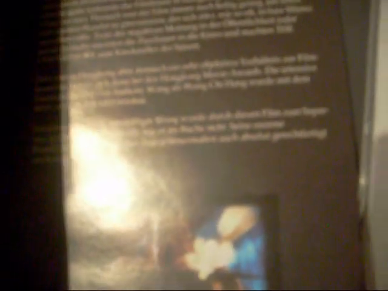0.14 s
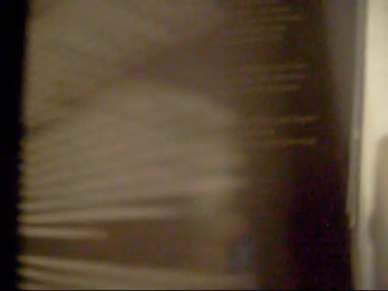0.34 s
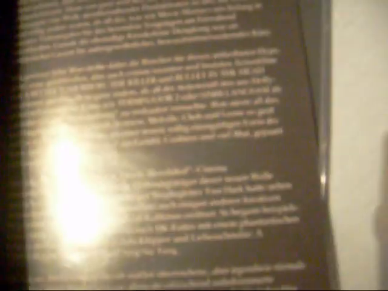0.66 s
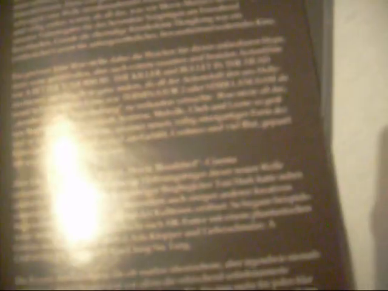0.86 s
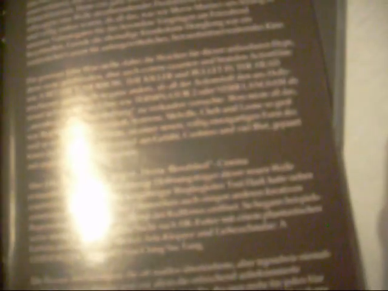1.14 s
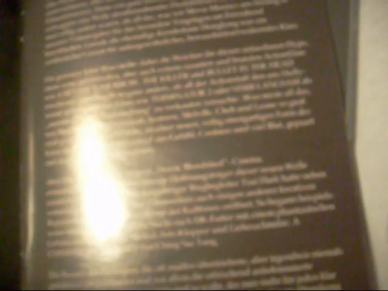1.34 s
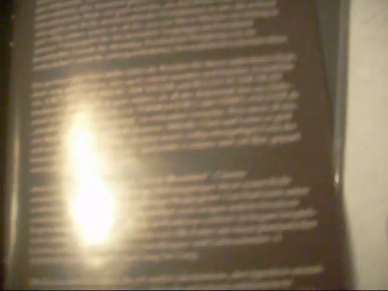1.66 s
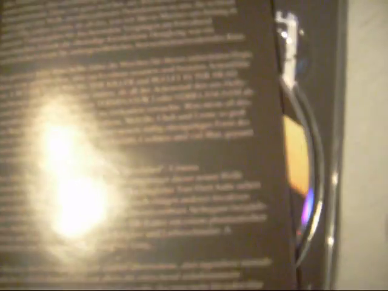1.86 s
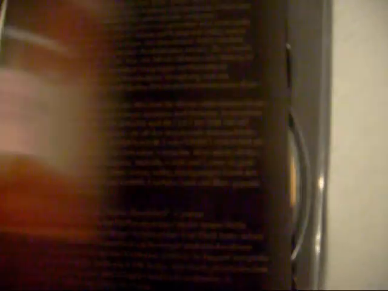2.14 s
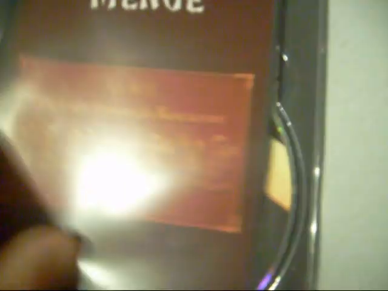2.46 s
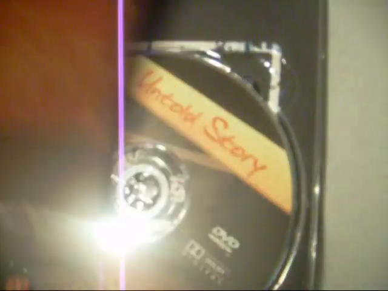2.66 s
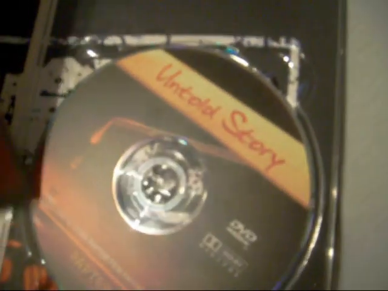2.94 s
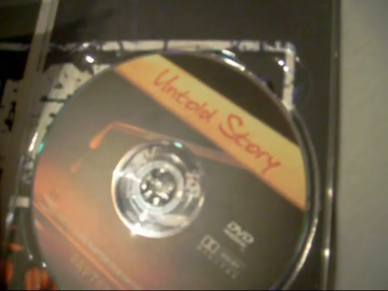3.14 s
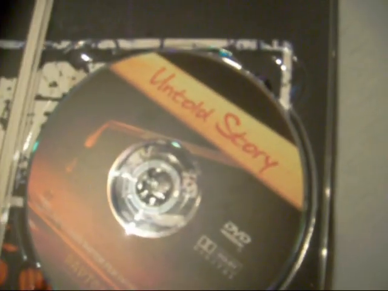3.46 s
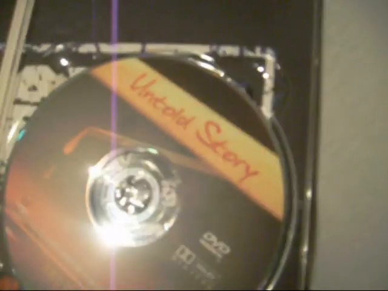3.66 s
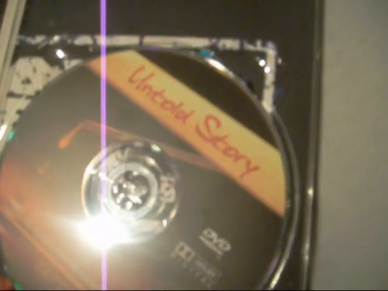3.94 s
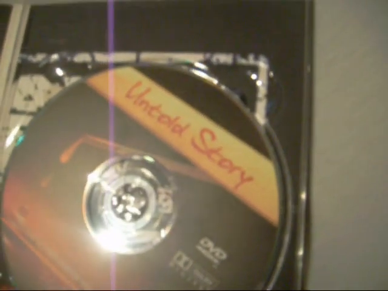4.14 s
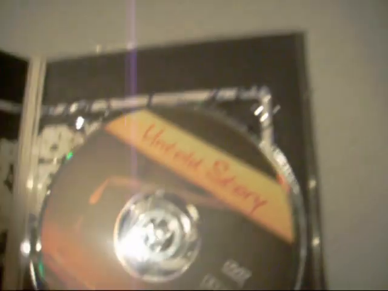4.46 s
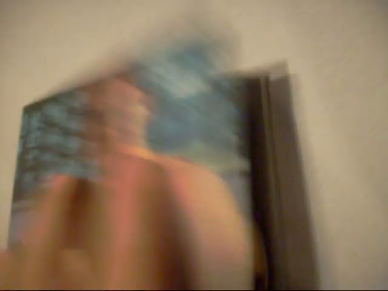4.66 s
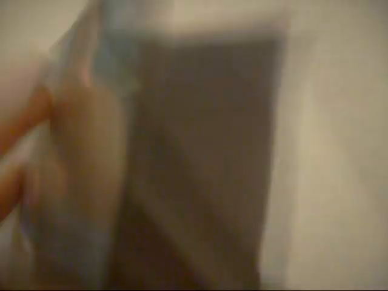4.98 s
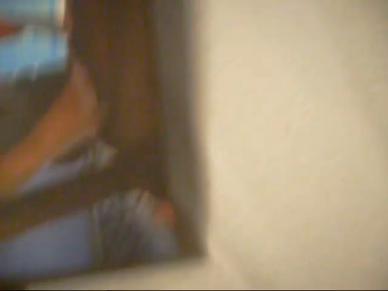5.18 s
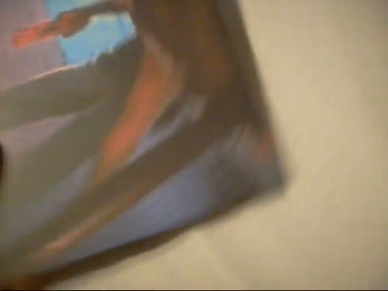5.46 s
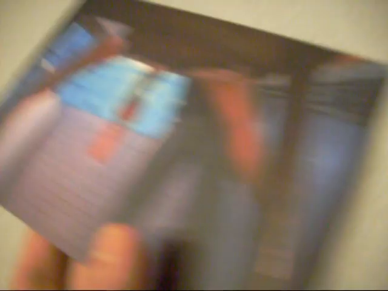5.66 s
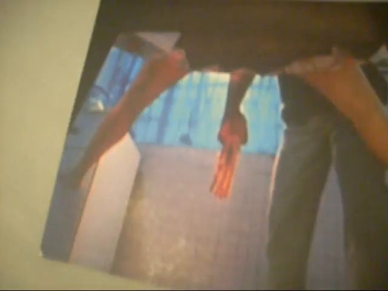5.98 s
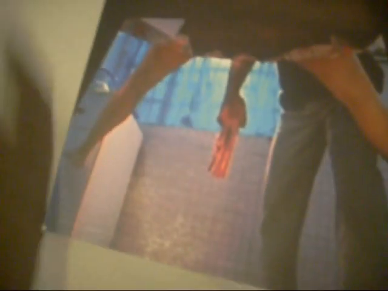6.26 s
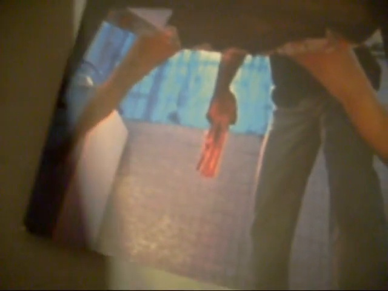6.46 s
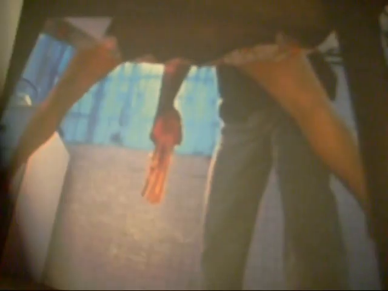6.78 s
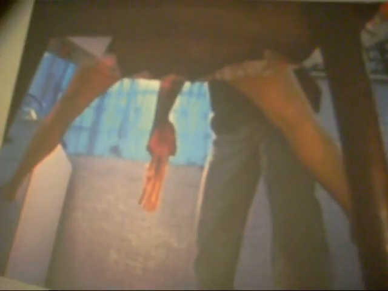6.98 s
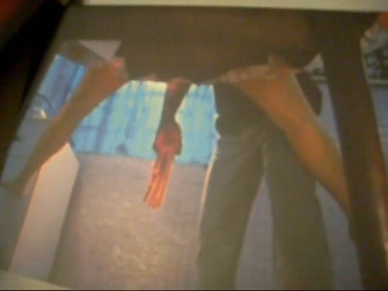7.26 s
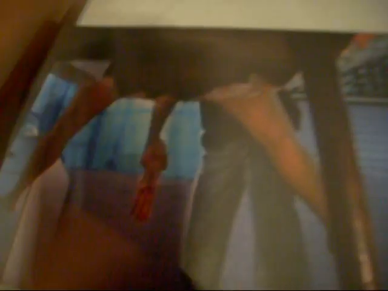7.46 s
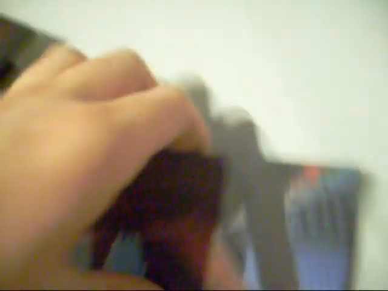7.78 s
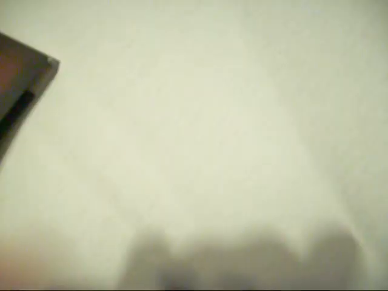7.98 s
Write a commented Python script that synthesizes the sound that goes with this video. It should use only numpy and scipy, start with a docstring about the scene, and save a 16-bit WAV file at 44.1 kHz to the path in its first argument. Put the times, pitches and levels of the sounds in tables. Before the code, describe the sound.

Close, dry scuffing of a thin plastic case and paper booklet, scattered light ticks, and one loud sharp snap near the end over faint hiss.

```python
"""A plastic disc case and its paper booklet are turned over by hand just in front of a small camera.
From the start, coloured noise rubs on the plastic and swells into short scuffs and slips. Among them,
damped modes of the case tick and quick pushes bump; near seven seconds the case snaps sharply. A small
room answers every tick with decaying noise. Hiss, faint whines and a hand's rumble run underneath."""
import sys
import numpy as np
from scipy import signal
from scipy.fft import rfft, irfft, next_fast_len
from scipy.io import wavfile
from scipy.ndimage import uniform_filter1d, map_coordinates

SR = 44100
rng = np.random.default_rng(int(sys.argv[2]) if len(sys.argv) > 2 else 0)


def unload_audio(sound):
    """Save the sound as a 16-bit wav file, at the path given as the first command line argument."""
    columns = np.transpose(np.atleast_2d(sound))
    # keep every value between -1 and 1, then stretch to whole-number steps
    steps = np.round(np.clip(columns, -1, 1) * 32767)
    wavfile.write(sys.argv[1], SR, steps.astype(np.int16))


N = 357651  # length in samples


def amp(db):
    """Logarithmic level: decibels to amplitude gain."""
    return 10 ** (np.asarray(db) / 20)


def unit(x):
    """Normalization: the signal scaled to rms 1."""
    return x / np.sqrt(np.mean(x ** 2) + 1e-20)


def along(points, hz):
    """Logarithmic pitch: (Hz, value) points interpolated on a log frequency axis."""
    point_hz, values = np.transpose(points)
    return np.interp(np.log(hz + 1), np.log(point_hz + 1), values)


def curves(rows):
    """Linear interpolation: one value per sample for each column after the time."""
    times, *columns = np.transpose(rows)
    return np.array([np.interp(np.arange(N) / SR, times, column) for column in columns])


def wobble(rate):
    """Slow random fluctuation: a smooth curve through rate random knots a second."""
    knots = rng.standard_normal(int(N * rate / SR) + 4)
    return map_coordinates(knots, [np.arange(N) * rate / SR])


def filtered(x, response):
    """Linear filtering: the spectrum times a response of frequency."""
    size = next_fast_len(N + SR // 2)
    return irfft(rfft(x, size) * response(np.fft.rfftfreq(size, 1 / SR)), size)[..., :N]


# Steady rubbing: time_s [s], bright_db [dB], dull_db [dB, panel level], crispness_db [dB, sheen over bright]
STEADY_RUB = [(0.0, -78, -74, -7), (0.29, -71, -71, -4), (0.45, -64, -63.5, -11.5), (0.63, -59, -62, -10),
              (0.91, -60.5, -64, -6.5), (1.07, -74, -74.5, -4), (1.42, -72, -71, -13.5),
              (1.6, -61, -68, -8.5), (1.7, -60.5, -63.5, -10), (1.79, -66.5, -71, -7),
              (2.05, -60, -64.5, -9), (2.19, -59, -62, -9), (2.42, -51, -61.5, -8.5),
              (2.62, -55, -61.5, -5.5), (2.74, -58, -60.5, -7), (2.94, -48.5, -62, -8.5),
              (3.08, -49.5, -58, -13.5), (3.14, -57.5, -63.5, -9), (3.25, -58, -66, -6.5),
              (3.41, -52.5, -60.5, -7.5), (3.53, -57, -66.5, -7), (3.73, -66, -70.5, -9.5),
              (3.97, -56.5, -66.5, -16.5), (4.2, -57, -64.5, -8), (4.67, -59, -61, -8),
              (4.73, -64, -64.5, -9), (4.87, -61.5, -62, -4.5), (5.09, -56.5, -66, -8.5),
              (5.24, -71.5, -73, -8), (5.54, -56.5, -61.5, -12), (5.78, -56.5, -57.5, -10),
              (5.91, -65, -61, -11.5), (6.02, -59, -54.5, -10), (6.19, -69, -73, -11),
              (6.4, -71.5, -70, -5), (6.66, -61.5, -67, -3), (7.0, -60, -67, -7), (7.25, -56.5, -58, -13.5),
              (7.3, -68.5, -69, -7), (7.46, -59, -62, -14.5), (7.51, -62, -67, -3),
              (7.59, -59.5, -64.5, -3.5), (7.8, -58, -63, -3), (8.04, -57, -69.5, -13.5),
              (8.11, -65.5, -66, -10)]
# Strokes and slips: start_s [s], length_s [s], rise [share of length], bright_db [dB],
# hollowness_db [dB, panel over bright]
SLIPS = [(0.073, 0.018, 0.67, -52, -7.5), (0.183, 0.025, 0.37, -66.5, -3), (0.33, 0.08, 0.45, -63.5, -1.5),
         (0.462, 0.065, 0.083, -54, -3.5), (0.572, 0.014, 0.92, -42, -1.5), (0.672, 0.025, 0.09, -43.5, -3),
         (0.708, 0.025, 0.28, -45.5, -3), (0.755, 0.016, 0.05, -47, 0.7), (0.781, 0.058, 0.019, -54, -1.5),
         (0.857, 0.028, 0.4, -48, -0.5), (1.287, 0.0087, 0.2, -59.5, 2.5), (1.324, 0.014, 0.1, -51.5, -3),
         (1.43, 0.01, 0.1, -49.5, -6.5), (1.463, 0.013, 0.05, -57, -2), (1.51, 0.081, 0.55, -62.5, -4),
         (1.655, 0.035, 0.37, -52, -11.5), (1.868, 0.031, 1, -52, -2.5), (1.964, 0.15, 0.3, -57.5, -26),
         (2.21, 0.11, 0.17, -54, -3.5), (2.313, 0.029, 0.7, -75.5, 19), (2.355, 0.035, 0.045, -49.5, -7.5),
         (2.417, 0.023, 0.8, -53, -6), (2.512, 0.026, 0.83, -52, 0.5), (2.551, 0.016, 0.64, -48.5, -6),
         (2.67, 0.075, 0.47, -54, -3.5), (2.747, 0.15, 0.2, -49.5, -14), (2.979, 0.12, 0.76, -51, -8.5),
         (3.152, 0.07, 0.45, -52.5, -13), (3.263, 0.13, 0.65, -50.5, -11.5), (3.271, 0.0055, 0.22, -54, -4),
         (3.363, 0.015, 0.33, -41, -9), (3.437, 0.034, 0.69, -51.5, -2.5), (3.542, 0.07, 0.62, -55, -10),
         (3.584, 0.07, 0.53, -49.5, -5.5), (3.802, 0.19, 0.53, -54, -14), (4.083, 0.2, 0.27, -60.5, -6),
         (4.35, 0.079, 0.79, -56, -16), (4.261, 0.023, 0.8, -51.5, 2), (4.597, 0.026, 0.46, -48.5, 1.5),
         (4.634, 0.014, 0.05, -48, 0.5), (4.89, 0.073, 0.55, -60, 0), (4.943, 0.15, 0.51, -53.5, -4.5),
         (5.137, 0.011, 0.27, -56.5, -1.5), (5.153, 0.013, 0.35, -58.5, -8),
         (5.639, 0.016, 0.75, -56, -0.5), (5.705, 0.063, 0.24, -49, -3), (5.769, 0.032, 0.45, -59.5, 5),
         (5.936, 0.25, 0.63, -55.5, -9), (6.42, 0.19, 0.52, -61, -9), (6.585, 0.037, 0.11, -69.5, 10.5),
         (6.674, 0.047, 0.5, -61.5, -5), (7.1, 0.11, 0.53, -54.5, -17), (7.221, 0.012, 0.22, -45, -3),
         (7.324, 0.079, 0.58, -59.5, -3), (7.439, 0.015, 0.27, -43, -3), (7.531, 0.075, 0.84, -55, -7),
         (7.636, 0.091, 0.34, -61.5, 1), (7.848, 0.12, 0.5, -57, -3.5), (7.926, 0.11, 0.27, -57.5, -5.5)]
# Low and edge parts of the rub: (dB over the leading scrape at RUB_MID_DB, dB gained per dB)
RUB_MID_DB = -58
EDGE_FOLLOWS_BRIGHT, LOW_FOLLOWS_DULL = (-6, 1), (-7.5, 0.99)
# Low and edge parts of a slip: (dB over bright, dB gained per dB of hollowness)
SLIP_LOW, SLIP_EDGE = (-7, 1.57), (-9.5, 0.42)
SLIP_CRISP_DB = -3.5  # a slip's sheen against the crispness of the rub at that moment
SWELL, SWELL_PER_S = 0.62, 2.8  # power of the rise and fall: longer strokes swell more gently


def follow(lead_db, rule):
    """Proportional levels: one part of the rub follows another."""
    over_db, gain = rule
    return RUB_MID_DB + over_db + gain * (lead_db - RUB_MID_DB)


def contact():
    """Addition of powers: steady rub plus slips, in bright, low, panel, edge and sheen."""
    bright, panel, crisp = curves(STEADY_RUB)
    low = follow(panel, LOW_FOLLOWS_DULL)
    edge = follow(bright, EDGE_FOLLOWS_BRIGHT)
    power = amp([bright, low, panel, edge, bright + crisp]) ** 2
    for start_s, length_s, rise, bright_db, hollow_db in SLIPS:
        start = round(start_s * SR)
        progress = np.arange(round(length_s * SR)) / (length_s * SR)
        rise = np.clip(rise, .02, .95)
        ramp = np.minimum(progress / rise, (1 - progress) / (1 - rise))
        shape = ramp ** (SWELL + SWELL_PER_S * length_s)
        low_db, edge_db = (over + gain * hollow_db for over, gain in (SLIP_LOW, SLIP_EDGE))
        sheen_db = crisp[start] + SLIP_CRISP_DB
        levels = amp(bright_db + np.array([0, low_db, hollow_db, edge_db, sheen_db]))[:, None]
        power[:, start:start + len(progress)] += levels ** 2 * shape / shape.mean()
    return power


# Frequency range of bright, low, panel, edge and sheen: centre_hz [Hz], spread [octaves]
PART_RANGES = [(3530, 0.33), (427, 0.64), (1368, 0.45), (2736, 0.18), (7950, 0.43)]


def friction():
    """Stick-slip friction: tiny catches of skin and paper come in clumps that all parts share."""
    drift_db = 0.6 * wobble(25)
    clump_db = 0.95 * wobble(150) + 0.7 * wobble(600)
    catch_db = 1.73 * rng.exponential(size=N)
    clumps = amp(drift_db + clump_db + catch_db)
    out = np.zeros(N)
    for power, (centre_hz, octaves) in zip(contact(), PART_RANGES):
        # each part is touched a little differently
        own_noise = amp(0.82 * wobble(40)) * rng.standard_normal(N)
        rubbing = np.sqrt(power) * unit(own_noise * clumps)
        out += filtered(rubbing, part_colour(centre_hz, octaves))
    return patchy(out, patchy_db=1.1)  # the grip shifts, and the colour with it


# Colour of rubbed plastic: frequency_hz [Hz], relative level_db [dB per Hz]
PLASTIC_COLOUR = [(88, -58), (150, -20), (196, -6.5), (324, -14), (752, -9), (949, -11), (1220, -10.5),
                  (1780, -8.5), (3510, -1), (9920, -35.5), (10800, -41), (14100, -79), (22000, -120)]
RING_DB = 0.5  # how far each mode of the case lifts the rubbing


def part_colour(centre_hz, octaves):
    """Resonant colouring: the plastic's spectrum around one range; white noise keeps its rms."""
    def response(f):
        modes = sum(1 / (1 + ((f - hz) / width) ** 2) for hz, width, _ in CASE_MODES)
        colour = amp(along(PLASTIC_COLOUR, f) + RING_DB * modes)
        distance = np.log2((f + 1) / centre_hz) / octaves
        gain = colour * np.exp(-distance ** 2 / 4)
        return gain / np.sqrt(np.mean(gain ** 2))
    return response


def patchy(x, patchy_db):
    """Spectral fluctuation: random gain in patches of time and frequency."""
    spectrum = signal.stft(x, nperseg=256)[2]
    field = rng.standard_normal(spectrum.shape)
    field = uniform_filter1d(field, size=4, axis=0)
    field = uniform_filter1d(field, size=14, axis=1)
    return signal.istft(spectrum * amp(patchy_db * unit(field)), nperseg=256)[1][:N]


# Sharp ticks of plastic and paper: time_s [s], peak_db [dB], panel_db and edge_db [dB over bright]
TICK_EVENTS = [(0.0851, -36, -8, -23), (0.3118, -37, 7, 4), (0.783, -28, 13, -2), (0.8708, -21.5, 5, -2),
               (1.32, -35.5, 15, -2.2), (1.4324, -37, -16, -17), (1.864, -36.5, 2, -1),
               (1.8907, -33.5, 1, -2), (1.9694, -35, -4, -5), (2.062, -32.5, 15.5, 0),
               (2.2103, -24, -6.5, -13), (2.357, -31.5, -3, -25), (2.528, -32.5, -9, -15),
               (2.5334, -31.5, -8, -5), (2.641, -32.5, -10, -3), (3.076, -35, -15, 12),
               (3.3603, -25, -24, -20), (3.3672, -22.5, -23, -14), (3.3742, -22.5, -2, -7),
               (3.4448, -29.5, -7, -2), (3.457, -32, -7, -1), (3.5446, -37.5, 10, 4),
               (3.7889, -33.5, -10.5, -8), (4.0017, -40, 7, 3), (4.5488, -28.5, 13, 12),
               (4.635, -20.5, 3.5, -12), (4.7576, -42, -4, -5), (4.7725, -27.5, 5, -0.5),
               (5.1424, -38, -12, 11), (7.0391, -2.5, -17, -15.5), (7.0508, -34, -19, -25),
               (7.104, -16, 0.3, 8.5), (7.2224, -27, -14, 1), (7.435, -28.5, -6, -4),
               (7.4433, -28.5, -0.3, -1), (7.4658, -34, 7, 5), (7.4773, -40, -2, 3), (7.5775, -34, 7, 12),
               (7.6522, -38.5, 3, 6), (7.71, -39.5, -6, 3), (7.8155, -36.5, 8, 9)]
# Modes of the case, before each tick's variation: pitch_hz [Hz], width_hz [Hz], relative level_db [dB]
CASE_MODES = [(828, 345, -4), (1390, 166, 0.5), (1860, 370, 2.5), (2720, 108, 2.2), (3630, 158, 1.1),
              (4500, 250, -3.5), (5290, 370, 5.5), (6520, 1500, 5), (8600, 3200, 5)]
# Part that each mode belongs to: part [0 bright, 1 panel, 2 edge, 3 sheen]
MODE_PARTS = (1, 1, 2, 2, 0, 0, 3, 3, 3)
TICK_SHEEN_DB = -9  # over bright, for the strongest tick
LIGHT_DULLS_DB = -1  # change of sheen for the lightest ticks


def ticks():
    """Modal ringing: a blow excites damped modes; light ticks stay local, shorter and less alike."""
    out, t = np.zeros(N + SR), np.arange(SR // 20) / SR
    luck = rng.standard_normal((len(TICK_EVENTS), 2, len(CASE_MODES)))
    # the edge rattles as it lets go
    chatter = rng.standard_normal((len(TICK_EVENTS), 256)) * .06 * np.exp(-t[:256] / .0012)
    chatter[:, 0] = 1
    for (time_s, peak_db, panel_db, edge_db), (strong, detune), blow in zip(TICK_EVENTS, luck, chatter):
        light = np.clip((-peak_db - 6) / 25, 0, 1)
        parts_db = (0, panel_db, edge_db, TICK_SHEEN_DB + LIGHT_DULLS_DB * light)
        ring = np.zeros(len(t))
        for i, (hz, width_hz, level_db) in enumerate(CASE_MODES):
            way = (-1) ** i  # neighbouring modes start in opposite directions
            gain = amp(parts_db[MODE_PARTS[i]] + level_db + (2.4 + 2.8 * light) * strong[i])
            decay = np.exp(-np.pi * width_hz * (1 + 1.3 * light) * t)
            pitch_hz = hz * (1 + (0.0046 + 0.05 * light) * detune[i])
            ring += way * gain * decay * np.sin(2 * np.pi * pitch_hz * t)
        onset = (1 - np.exp(-t / 0.000066)) ** 2
        ring = np.convolve(ring * onset, blow)
        out[round((time_s - .0003) * SR):][:len(ring)] += amp(peak_db) * ring / abs(ring).max()
    return out[:N]


# Soft bumps of finger or case: time_s [s, within the first push], level_db [dB, peak of that push],
# pitch_hz [Hz]
BUMP_EVENTS = [(0.34, -50.5, 504), (0.6729, -28, 550), (0.708, -41, 293), (0.753, -40.5, 304),
               (0.7829, -32.5, 620), (1.2888, -52, 248), (1.321, -50.5, 490), (1.4012, -45, 328),
               (1.863, -65, 500), (1.9701, -48.5, 490), (2.0623, -45.5, 152), (2.0725, -48.5, 206),
               (2.368, -48, 295), (2.646, -55.5, 120), (3.0244, -45, 560), (3.376, -36, 295),
               (3.459, -44.5, 400), (3.545, -46.5, 410), (3.67, -57, 89.5), (4.4117, -37, 564),
               (4.5509, -43.5, 607), (4.638, -42, 157), (4.738, -52, 60.6), (4.774, -46.5, 59),
               (4.8216, -65, 60), (5.0523, -52.5, 150), (5.6523, -45, 212), (6.5928, -47.5, 526),
               (7.117, -43.5, 229), (7.228, -45.5, 207), (7.4465, -40, 132), (7.677, -51, 121)]


def bumps():
    """Impulse and rebound: a soft blow is one quick push; the loose case then shudders a few cycles."""
    out = np.zeros(N + SR)
    luck = rng.standard_normal((len(BUMP_EVENTS), 12))
    for (time_s, level_db, hz), (way, *shudder) in zip(BUMP_EVENTS, luck):
        turn = 2 * np.pi * (np.arange(round(2 * SR / hz)) * hz / SR - 1)
        push = turn * np.exp(.5 - turn ** 2 / 2)
        blows = np.zeros(round(6 * SR / hz))
        after_blows = .25 * np.array(shudder) * np.exp(-np.arange(11) / 4.5)
        blows[::len(blows) // 12 + 1] = np.r_[np.sign(way), after_blows]
        sound = np.convolve(push, blows)
        out[round((time_s - 1.1 / hz) * SR):][:len(sound)] += amp(level_db) * sound
    return out[:N]


# Reverberation of the room: frequency_hz [Hz], t60_s [s, time to fall 60 dB]
ROOM_DECAY = [(500, 0.34), (1500, 0.31), (3500, 0.27), (9000, 0.19)]


def room(x):
    """Reverberation: diffuse noise in which each frequency dies at its own speed."""
    hz, t, noise = signal.stft(rng.standard_normal(SR // 2), SR, nperseg=256)
    decay = amp(-60 * t / along(ROOM_DECAY, hz)[:, None])
    tail = signal.istft(noise * decay, SR, nperseg=256)[1]
    delayed = np.pad(x, (300, 0))  # samples before the room answers
    return signal.fftconvolve(delayed, tail / np.linalg.norm(tail))[:N]


# Rumble of the hand on the camera: time_s [s], level_db [dB]
HAND_SHAKE = [(0.0, -84), (0.36, -83), (0.74, -67), (1.1, -89), (1.7, -83), (2.0, -75), (2.07, -66),
              (2.16, -65), (2.96, -80.5), (3.64, -73), (3.95, -85), (4.3, -84), (4.63, -64), (4.85, -64),
              (5.2, -86), (5.67, -67), (6.3, -88), (6.58, -69), (6.9, -84), (7.15, -71), (7.48, -77),
              (7.64, -65), (7.85, -76), (8.11, -75)]
# Colour of the rumble: frequency_hz [Hz], relative level_db [dB per Hz]
RUMBLE_COLOUR = [(15, -16), (35, -2), (70, -5), (130, -4), (250, -15.5), (500, -41.5)]


def hand_rumble():
    """Structure-borne noise: the hand on the camera's body gives unsteady low noise."""
    noise = filtered(rng.standard_normal(N), lambda hz: amp(along(RUMBLE_COLOUR, hz)))
    return amp(curves(HAND_SHAKE)[0]) * unit(amp(5.9 * wobble(16)) * noise)


# Colour of the hiss: frequency_hz [Hz], relative level_db [dB per Hz]
HISS_COLOUR = [(25, -4), (170, -9), (270, -8.5), (350, -6.5), (730, -6.5), (1220, -7), (1460, -7),
               (2250, -8), (2900, -4), (3460, -4.5), (5300, -15.5), (10200, -12), (11000, -32.5)]
HISS_DB = -68.5  # rms before the band limit


def hiss():
    """Electronic noise: the camera's steady hiss is white noise with a fixed colour."""
    noise = filtered(rng.standard_normal(N), lambda hz: amp(along(HISS_COLOUR, hz)))
    return amp(HISS_DB) * unit(noise)


# Whines of the electronics, about which each wavers: pitch_hz [Hz], level_db [dB rms]
WHINE_TONES = [(275, -86.5), (1497, -78.5), (2840, -78), (7188, -87), (8786, -98), (8846, -95.5)]


def whines():
    """Modulated tones: faint sines of the electronics waver in level and phase."""
    t = np.arange(N) / SR
    out = np.zeros(N)
    for hz, level_db in WHINE_TONES:
        level = np.sqrt(2) * amp(level_db + 1.7 * wobble(6))
        out += level * np.sin(2 * np.pi * hz * t + 1.3 * wobble(12))
    return out


def scene():
    """Superposition: the case close by, its ticks echoed by the room, over the camera's own noise."""
    sharp = ticks()
    case = friction() + sharp + bumps()
    camera = hand_rumble() + hiss() + whines()
    return (case + amp(-14.5) * room(sharp) + camera)[None]


TOP_HZ = 11000  # band limit


def record(dry):
    """Band limiting: the camera rolls off towards its limit and keeps nothing above it."""
    def response(hz):
        rolloff_db = -22 * np.clip((hz - 10450) / 550, 0, 1) ** 2
        return (hz < TOP_HZ) * amp(rolloff_db)
    return filtered(dry, response)


dry = scene()
out = record(dry)
unload_audio(out)
```